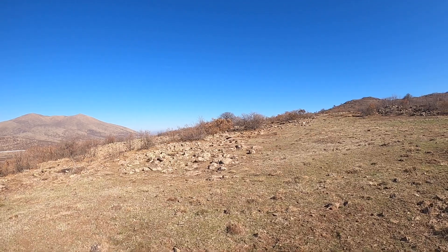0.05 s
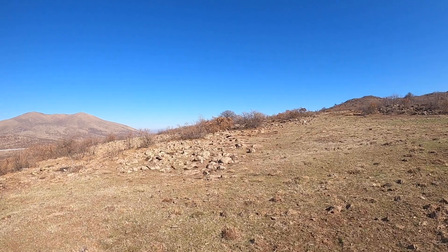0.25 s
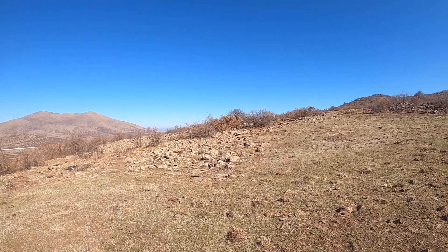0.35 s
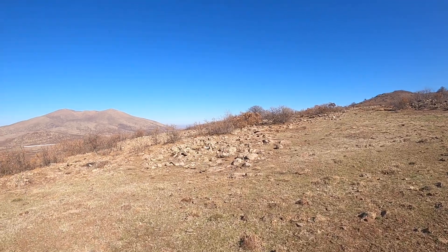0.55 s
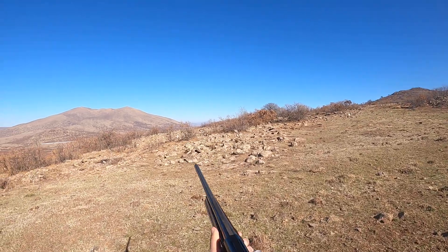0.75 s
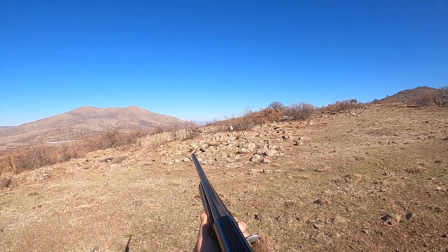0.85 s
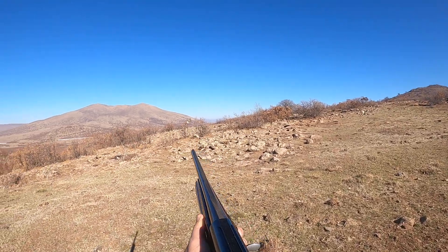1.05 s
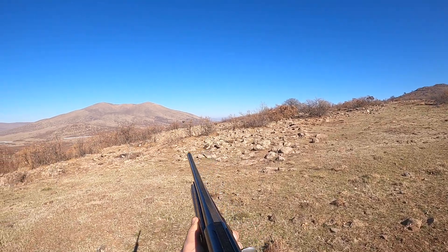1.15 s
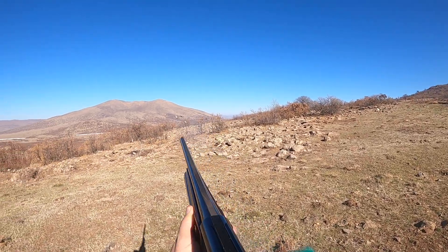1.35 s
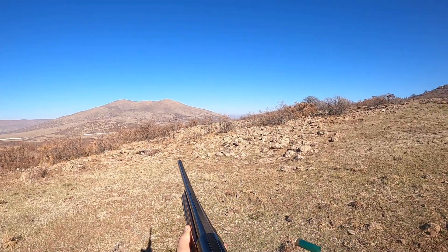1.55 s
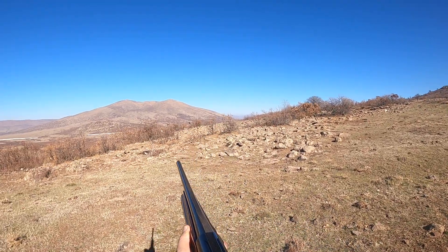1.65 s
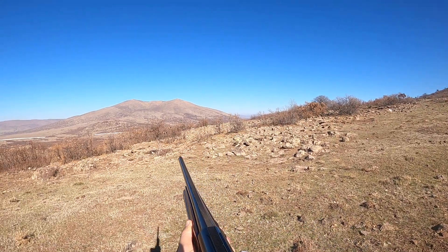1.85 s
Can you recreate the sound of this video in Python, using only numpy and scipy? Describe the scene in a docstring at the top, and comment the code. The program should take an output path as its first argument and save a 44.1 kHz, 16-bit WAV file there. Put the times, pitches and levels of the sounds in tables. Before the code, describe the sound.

One loud close shotgun shot outdoors, preceded by handling clicks and wind, followed by a short echo

```python
"""A hunter on an open hillside: wind buffets two microphone ports over the hiss of a valley, both shaped noise.
Sleeve and grass rustle as grainy noise, a partridge whirrs away in short falling whistles, and the raised gun
clicks and bumps as ringing modes and soft pulses. A soft noise and a thin high tone swell into the shot:
a cluster of dispersed pulses with the bass late, in a burst of gas hiss. The action clicks as it cycles, the
slope answers in flickering noise, and the blast overloads the recorder. Table levels are ahead of the recorder."""
import sys
import numpy as np
from scipy import signal
from scipy.fft import rfft, irfft
from scipy.io import wavfile
from scipy.ndimage import uniform_filter1d, map_coordinates

SR = 44100
rng = np.random.default_rng(int(sys.argv[2]) if len(sys.argv) > 2 else 0)


def bounce(signal):
    """Save signal as a 16-bit WAV file at the path given by the first command-line argument."""
    frames = np.transpose(np.atleast_2d(signal))
    limited = np.clip(frames, -1, 1)
    pcm = np.round(limited * 32767).astype(np.int16)
    wavfile.write(sys.argv[1], SR, pcm)


N = 83790
TIME = np.arange(N) / SR  # seconds
TRIGGER_S, GAS_S = 1.4495, 1.468  # reference moment of the shot; crest of the gas hiss
SIDE_DB = -11.5  # side (left-right difference) noise relative to the noise common to both ears

# Spectrum of the treble in rustle and echo. Each row: frequency in Hz, level per hertz in dB.
TREBLE_COLOUR = [(2060, -31), (3500, -4), (4810, -4), (6520, -7.5), (7570, -9), (12500, -24.5),
                 (15000, -35)]


def undb(db):
    """Decibels to amplitude ratio: 20 dB is a factor of ten."""
    return 10 ** (np.asarray(db, float) / 20)


def unit(x):
    """Normalise to unit root-mean-square."""
    return x / np.sqrt(np.mean(x ** 2))


def response(colour, size):
    """Gain per FFT bin, linear in dB over log frequency, falling steeply outside the given points."""
    points = np.array(colour, float)
    octave = np.log2(np.maximum(np.arange(size // 2 + 1) * SR / size, 1))
    knots = np.log2(points[:, 0])
    below = np.maximum(knots[0] - octave, 0)
    above = np.maximum(octave - knots[-1], 0)
    # 28 and 33 dB per octave
    return undb(np.interp(octave, knots, points[:, 1]) - 28 * below - 33 * above)


def noise(colour):
    """Spectral shaping: white noise filtered to a given spectrum, at unit RMS."""
    return unit(irfft(rfft(rng.standard_normal(N)) * response(colour, N), N))


def walk(rate):
    """Slow random modulation: levels held 1 / rate s, smoothed twice and scaled to unit spread."""
    hold = int(SR / rate)
    steps = np.repeat(rng.standard_normal(N // hold + 1), hold)
    smooth = uniform_filter1d(uniform_filter1d(steps, hold), hold)[:N]
    return smooth / smooth.std()


def curve(table, col):
    """Linear interpolation of one table column over time."""
    points = np.array(table, float)
    return np.interp(TIME, points[:, 0], points[:, col], left=points[0, col])


def pan(x, db):
    """Interaural level difference: left minus right in dB, shared equally between the two sides."""
    return x * undb(np.array([db, -db]).reshape(2, -1) / 2)


def wide(colour, side_db, grain_db, rate):
    """Partly correlated stereo: common and opposed noise under one random flicker of level."""
    side = undb(side_db) * noise(colour) * np.array([[1], [-1]])
    pair = noise(colour) + side
    return unit(pair * undb(grain_db * walk(rate)))


def add(out, s, x):
    """Superposition: sum a sound into the stereo mix from s seconds."""
    i = int(s * SR)
    n = min(x.shape[-1], N - i)
    out[:, i:i + n] += x[..., :n]


def ports(colour, likeness):
    """Partial coherence: turbulence at two ports shares some power, while gusts flicker separately."""
    shared = noise(colour)
    sides = []
    for _ in range(2):
        turbulence = np.sqrt(likeness) * shared + np.sqrt(1 - likeness) * noise(colour)
        sides.append(turbulence * undb(2.5 * walk(13.5)))
    pair = np.array(sides)
    return pair / np.sqrt(np.mean(pair.mean(axis=0) ** 2))


def wind():
    """Turbulent pressure at the ports: low buffeting and a faster flutter that fades after the shot."""
    # Wind on the ports. Each row: moment in seconds, level in dB, left minus right of the buffeting in dB,
    # level of the flutter relative to that level in dB.
    gusts = [(0.0, -47, 19, -2), (0.132, -37, 7, -11), (0.222, -38, 30, -8), (0.296, -40, 6.5, -13.5),
             (0.338, -27, 12.5, -16.5), (0.422, -37.5, 19, -0.5), (0.448, -27, 18, -11.5),
             (0.534, -39, 7.5, -1.5), (0.666, -37, -1, -10), (0.73, -30.5, 8.5, -5.5),
             (0.91, -31.5, 9, -14), (0.956, -31, 19, -8.5), (1.004, -40, -8, -12), (1.062, -31, 12.5, -12),
             (1.19, -29.5, 4.5, -2), (1.238, -35, 18, 4.5), (1.27, -36.5, -6, -2), (1.306, -28, 20.5, -0.5),
             (1.386, -28.5, -10, -10.5), (1.422, -32.5, 19, -7.5), (1.486, -33, 10, 15), (1.55, -49, 8, 31),
             (1.852, -38.5, 8.5, 3), (1.9, -34.5, -8, -7)]
    # Spectra of buffeting and flutter. Each row: frequency in Hz, level per hertz in dB.
    buffet_colour = [(12, -5), (20, 2), (71, -0.5), (130, -9.5), (170, -45), (290, -120)]
    flutter_colour = [(90, 0), (130, 3.5), (200, 1), (300, -10.5), (450, -24.5)]
    fade = np.clip((TRIGGER_S + 0.0531 - TIME) / 0.011, 0, 1)
    flutter = ports(flutter_colour, 0.45) * undb(curve(gusts, 3)) * fade
    buffet = pan(ports(buffet_colour, 0.26), curve(gusts, 2))
    return (buffet + flutter) * undb(curve(gusts, 1))


def valley():
    """Diffuse far sound: smooth broadband hiss whose level drifts."""
    # Distant hiss. Each row: moment in seconds, level in dB.
    hiss_level = [(0, -45.5), (.08, -49), (.14, -53), (1.4, -66), (1.5, -51), (1.9, -56.5)]
    # Spectrum of the hiss. Each row: frequency in Hz, level per hertz in dB.
    hiss_colour = [(180, -37), (300, -9), (428, -5), (453, -14), (685, -22), (1780, -8.5), (2020, -21),
                   (2200, -14.5), (2610, -17.5), (9000, -50.5), (11700, -92), (19800, -120)]
    return wide(hiss_colour, SIDE_DB, 2.2, 42.43) * undb(curve(hiss_level, 1))


def rustle():
    """Friction noise: sleeve and dry grass give grainy hiss in two bands, fading out after the shot."""
    # Rustle. Each row: moment in seconds, level of the lower band in dB, level of the treble in dB.
    rub_levels = [(0.26, -77, -81), (0.34, -52.5, -51.5), (0.382, -50.5, -56.5), (0.45, -40, -50),
                  (0.5, -45.5, -59), (0.57, -44.5, -54.5), (0.69, -41, -59), (0.984, -45, -59.5),
                  (1.178, -53, -60.5), (1.282, -53, -61), (1.378, -57.5, -64.5), (1.46, -40, -53)]
    # Spectrum of the lower band. Each row: frequency in Hz, level per hertz in dB.
    rub_colour = [(210, -32), (350, -2), (526, -4), (941, 1), (1240, -6.5), (1400, -2), (2400, -5.5),
                  (4000, -20), (5200, -24), (8800, -120)]
    grain_db = 3
    fade_out = np.clip((TRIGGER_S + 0.055 - TIME) / 0.014, 0, 1)
    fade_in = np.clip((TIME - rub_levels[0][0]) / 0.013, 0, 1) ** 2
    low = wide(rub_colour, SIDE_DB, grain_db, 90.23) * undb(curve(rub_levels, 1))
    top = wide(TREBLE_COLOUR, SIDE_DB + 8, grain_db, 120) * undb(curve(rub_levels, 2))
    return (low + top) * fade_out * fade_in


def wings():
    """Aeolian tones: each stroke is a rough falling whistle of feathers, a higher one and a puff of air."""
    # Wing strokes. Each row: start in seconds (sounded 2 ms earlier), level in dB, whistle in Hz, upper
    # whistle relative in dB, nominal length in seconds, share by which the upper pitch falls (lower: twice it).
    strokes = [(0.324, -46.5, 1050, 7, 0.0093, 0.4), (0.373, -39.5, 835, 4.5, 0.017, 0.2),
               (0.426, -32.5, 956, -8, 0.011, 0.11), (0.481, -34, 932, -7, 0.0116, 0.23),
               (0.553, -35, 830, -12, 0.0085, 0.39), (0.606, -38, 804, -28, 0.011, 0.47),
               (0.64, -27, 645, -20, 0.0085, 0.1), (0.647, -30, 1052, -23, 0.0052, 0.2),
               (0.666, -27.5, 958, 2, 0.0093, 0.17), (0.721, -34, 980, -25, 0.013, 0.39),
               (0.742, -28.5, 830, -10.5, 0.0053, 0.15), (0.773, -31, 823, -34, 0.011, 0.34),
               (0.802, -34, 757, -24, 0.023, 0.28), (0.826, -33.5, 707, -10, 0.02, 0.1),
               (0.884, -32.5, 780, -5, 0.0077, 0.16), (0.934, -35, 830, -5, 0.011, 0.21),
               (0.99, -34, 784, -3, 0.008, 0.12), (1.016, -46, 1180, -9, 0.0099, 0.49),
               (1.034, -37, 1200, -12, 0.006, 0.24), (1.045, -30.5, 956, -6, 0.011, 0.45),
               (1.074, -35.5, 980, -25, 0.006, 0.1), (1.098, -34.5, 783, -7, 0.015, 0.33),
               (1.149, -35.5, 896, -15, 0.021, 0.25), (1.207, -37.5, 846, -4, 0.015, 0.42),
               (1.26, -34.5, 810, -12.5, 0.018, 0.24), (1.318, -34.5, 760, -18, 0.014, 0.068),
               (1.36, -39.5, 980, -2.5, 0.013, 0.093), (1.375, -35.5, 764, -22, 0.0098, 0.092),
               (1.416, -39, 730, -5, 0.016, 0.049), (1.845, -34, 957, -22, 0.01, 0.44)]
    # Pitch of the upper whistle. Each row: moment in seconds, frequency in Hz.
    upper_pitch = [(.3, 2656), (.68, 2760), (.78, 2346), (1.4, 2472)]
    # Spectrum of the air puff. Each row: frequency in Hz, level per hertz in dB.
    puff_colour = [(500, -32), (900, -4.5), (2500, 5), (5000, -6), (10000, -34)]
    waver, rough, puff_db, pan_db = .15, .7, -17, -.7  # waver and rough are shares of pitch and amplitude

    def phase_per_hz(u, fall, wobble):
        return 2 * np.pi * np.cumsum(1 + fall * (.4 - u) + waver * wobble) / SR

    out = np.zeros((2, N))
    air = noise(puff_colour)
    upper_hz = curve(upper_pitch, 1)
    chance = rng.standard_normal((len(strokes), 5, 12))
    for (s, db, hz, upper_db, length, fall), draws in zip(strokes, chance):
        start = int(s * SR)
        u = np.linspace(0, 1, int(max(length, .003) * 1.105 * SR))  # progress through the stroke
        env = np.sin(np.pi * u ** 0.6) ** 2
        slow = [np.interp(u * 11, np.arange(12), d) for d in draws]
        whistle = (1 + rough * slow[0]) * np.sin(hz * phase_per_hz(u, 2 * fall, slow[1]))
        upper = np.sin(upper_hz[start] * phase_per_hz(u, fall, slow[3] / 4))
        upper = undb(upper_db) * (1 + rough / 2 * slow[2]) * upper
        puff = undb(puff_db) * air[start:][:len(u)]
        add(out, s - .002, pan(undb(db) * env * (whistle + upper + puff), pan_db))
    return out


def clicks():
    """Impulse excitation: a crack of noise also rings the resonant modes of the gun's metal."""
    # Clicks of gun and sling. Each row: start in seconds, relative level in dB, 60 dB decay of the exciting
    # noise in seconds (at least 0.004), brightness in dB per octave, rise in seconds (limited below).
    blows = [(0.334, -37.5, 0.037, 11.5, 0.0011), (0.3467, -36, 0.014, 8, 0.00057),
             (0.374, -26, 0.011, 4.5, 0.0018), (0.4011, -30, 0.034, 3.5, 0.0025),
             (0.454, -52, 0.02, 13, 0.0015), (0.471, -33.5, 0.062, 5, 0.0018),
             (0.5255, -20, 0.03, 4.5, 0.0013), (0.5292, -20.5, 0.014, -0.5, 0.00083),
             (0.5767, -13.5, 0.0078, 4.5, 0.0015), (0.5882, -23.5, 0.019, -1, 0.00085),
             (0.649, -25, 0.033, -0.5, 0.0017), (0.667, -39.5, 0.011, 12, 0.00084),
             (0.8128, -32, 0.098, 0, 0.0044), (0.8709, -34.5, 0.012, 2, 0.0025),
             (0.8838, -33, 0.014, 2, 0.0012), (0.8946, -23.5, 0.024, 3, 0.0023),
             (0.911, -36, 0.011, 3, 0.00094), (1.431, -30, 0.048, -1.5, 0.00085),
             (1.452, -22.5, 0.023, 0, 0.00081), (1.4949, -17.5, 0.028, 4.5, 0.00053),
             (1.499, -42, 0.058, 6, 0.00084), (1.5646, -28, 0.011, -4, 0.00081),
             (1.5859, -30, 0.011, 9, 0.0036), (1.5921, -17, 0.036, 4, 0.0008),
             (1.596, -52, 0.023, -8, 0.001), (1.6043, -30.5, 0.019, -26, 0.0012),
             (1.626, -33.5, 0.042, 3, 0.0015), (1.6507, -28, 0.013, 1, 0.0011)]
    # Modes of the gun. Each row: frequency in Hz, width in Hz, level in dB.
    gun_modes = [(1190, 550, 15), (1690, 410, 9), (2780, 480, -1.5), (3890, 700, -11), (4730, 520, -6.5),
                 (6350, 290, -22.5), (8280, 520, -12.5)]
    # Spectrum of the crack. Each row: frequency in Hz, level per hertz in dB.
    crack_colour = [(290, 0), (500, 8), (745, 3), (2880, 11), (3720, 2.5), (8490, -10), (12300, -24),
                    (15000, -55)]
    modes_db, scatter_db = -2, 3  # ring relative to crack; unevenness of the modes from blow to blow
    out, size = np.zeros((2, N)), 4096
    t = np.arange(size) / SR - .02
    f = np.arange(size // 2 + 1) * SR / size
    modes = np.array([undb(db) / (1 + 2j * (f - hz) / width) ** 2 for hz, width, db in gun_modes])
    crack = unit(response(crack_colour, size))
    chance = rng.standard_normal((len(blows), 2, size))
    for (s, db, t60, tilt_db, rise), draws in zip(blows, chance):
        rise = np.clip(rise, .0003, .008)
        attack = np.exp(-2 * ((t - rise) / rise) ** 2)
        decay = undb(-60 * (t - rise) / max(t60, .004))
        env = np.where(t < rise, attack, decay)
        ring = undb(scatter_db * draws[0, :len(modes)]) @ modes
        body = crack + undb(modes_db) * ring / np.sqrt(np.mean(abs(ring) ** 2))
        hit = (draws[0] + undb(SIDE_DB) * draws[1] * np.array([[1], [-1]])) * env
        tilt = undb(tilt_db * np.log2(np.maximum(f, 500) / 4000))
        x = irfft(rfft(hit) * body * tilt, size)
        level = undb(db) * np.sqrt(np.sum(env ** 2) / np.sum(x[0] ** 2)) / 2  # equal energy for equal envelopes
        add(out, s - .02, x * level)
    return out


def bumps():
    """Momentum transfer: each bump is one soft pressure push with a broader rebound."""
    # Bumps of the stock on the body, and the recoil. Each row: centre in seconds, level in dB,
    # time scale in seconds, left minus right in dB.
    pushes = [(0.406, -18, 0.0022, 0), (0.7477, -10.5, 0.0042, 10), (0.801, -19.5, 0.0022, 1),
              (1.4723, -21, 0.0054, -26), (1.478, -16, 0.0019, -1), (1.8745, -32, 0.0029, -25)]
    out = np.zeros((2, N))
    for s, db, length, pan_db in pushes:
        u = np.arange(-3 * length, 5 * length, 1 / SR) / length
        push = -np.exp(-(u / 0.31) ** 2)
        rebound = 0.068 * np.exp(-((u - .55) / 1.4) ** 2) + 0.2 * np.exp(-((u + 0.1) / 1.1) ** 2)
        add(out, s - 3 * length, pan(undb(db) * (push + rebound), pan_db))
    return out


def lead_in():
    """Exponential growth: a soft noise and a thin high tone swell into the shot, then stop quickly."""
    # Spectrum of the soft noise. Each row: frequency in Hz, level per hertz in dB.
    swell_colour = [(300, -3), (800, 0), (1800, -8), (3500, -17), (7000, -27), (12000, -48)]
    end_s, tone_start_s, tone_hz = 1.465, 1.436, 7920
    t = TIME - end_s

    def swell(rise_s):
        return np.exp(np.minimum(t, 0) / rise_s - np.maximum(t, 0) / .002)

    swell_noise = wide(swell_colour, SIDE_DB, 3.9, 300) * undb(-17)
    gate = np.clip((TIME - tone_start_s) / .004, 0, 1)
    tone = np.sin(2 * np.pi * tone_hz * t) * undb(-33 + 2 * walk(300)) * gate
    return swell_noise * swell(.006) + tone * swell(.013)


def blast():
    """Dispersion: each arrival is a pulse with late bass, scattered off arms and body, amid gas hiss."""
    # Arrivals from muzzle, action, ground and rocks. Each row: start in seconds, peak in dB before panning,
    # left minus right in dB, tilt in dB per octave, share of the smear.
    arrivals = [(1.4656, -2, -1, -1.5, 1), (1.4682, -5, -1, 5, .1), (1.4716, -2, 0, 4.5, .12),
                (1.4738, -6, 0, -1, .25), (1.4785, -8, 0, -6, .3), (1.4933, -11, .5, 3.5, .2)]
    # Spectra of pulse and gas. Each row: frequency in Hz, level in dB (per hertz for the gas).
    pulse_colour = [(60, -20), (250, -8), (550, -14), (1100, -3), (1700, -3), (3500, -11), (8000, -22),
                    (12300, -39), (15000, -70)]
    gas_colour = [(290, -29), (500, -35), (1150, -34), (1510, -13), (2160, -1), (8240, -5), (14500, -33)]
    smear_s, smear_law = .006, .9  # full-share delay at 1 kHz; its growth toward the bass
    scatter_db, scatter_t60_s = -3, .012
    gas_attack_s, gas_t60_s, gas_db = .0015, .06, -15
    out, size = np.zeros((2, N)), 8192
    f = np.maximum(np.arange(size // 2 + 1) * SR / size, 60)
    delay = smear_s * (np.clip(f, 500, 5000) / 1000) ** -smear_law
    phase = 2 * np.pi * np.cumsum(delay) * SR / size  # phase is the integral of group delay
    decay = undb(-60 * np.arange(size) / SR / scatter_t60_s)
    for s, db, pan_db, tilt_db, share in arrivals:
        smear = response(pulse_colour, size) * np.exp(-1j * share * phase)
        tail = np.array([[1, 0.47], [1, -0.63]]) @ rng.standard_normal((2, size)) * decay
        paths = 1 + undb(scatter_db) * rfft(tail) / np.sqrt(np.sum(tail ** 2) / 2)
        tilt = undb(tilt_db * np.log2(np.maximum(f, 500) / 2000))
        pulse = irfft(smear * paths * tilt, size)[:, :size // 2]
        add(out, s, pan(undb(db) * pulse / abs(pulse).max(), pan_db))
    t = TIME - GAS_S
    env = np.where(t < 0, np.exp(t / gas_attack_s), undb(-60 * np.maximum(t, 0) / gas_t60_s))
    return out + wide(gas_colour, 0.0, 2.2, 130) * env * undb(gas_db)


def echo():
    """Diffuse reflection: slope, rocks and scrub return flickering noise in bands over a decaying body."""
    # Echo. Each row: moment in seconds, level of the middle band in dB, of the rumble in dB, of the treble in dB.
    returns = [(1.49, -34, -26, -39.5), (1.51, -46, -48, -51.5), (1.55, -43.5, -27.5, -52.5),
               (1.6, -42, -31.5, -51), (1.62, -43, -44, -54), (1.65, -43.5, -34.5, -57.5),
               (1.69, -41.5, -38.5, -65), (1.73, -38.5, -38.5, -60), (1.755, -45.5, -39.5, -62.5),
               (1.78, -42, -46, -64), (1.8, -45.5, -48, -71), (1.825, -57, -42.5, -74),
               (1.86, -51.5, -53, -78), (1.9, -60.5, -43, -93)]
    # Spectra of middle band, rumble and low-mid tail. Each row: frequency in Hz, level per hertz in dB.
    mid_colour = [(260, -35), (450, -35), (579, -41), (636, -12.5), (2670, -8), (3400, -18.5),
                  (3890, -16.5), (5500, -26.5), (7150, -31.5), (12100, -120)]
    rumble_colour = [(41, -74), (70, -20), (86, -10), (135, 6), (274, -0.5), (434, -14), (600, -19),
                     (780, -37), (1320, -120)]
    body_colour = [(200, -6), (330, -1.5), (600, -10), (950, -2.5), (1400, -13)]
    grain_db, side_db = 2.6, -13.
    body_db, body_t60_s = -30, 0.4
    onset = np.clip((TIME - TRIGGER_S) / 0.017, 0, 1)
    mid = wide(mid_colour, side_db, grain_db, 150) * undb(curve(returns, 1))
    rumble = wide(rumble_colour, side_db - 7, grain_db, 29.8) * undb(curve(returns, 2))
    top = wide(TREBLE_COLOUR[2:], side_db + 11.5, grain_db, 77.6) * undb(curve(returns, 3))
    since = TIME - GAS_S
    decay = undb(body_db - 60 * np.maximum(since, 0) / body_t60_s) * (since > 0)
    body = wide(body_colour, side_db - 3, grain_db, 58.2) * decay
    return (mid + rumble + top) * onset + body


def scene():
    """Interaural time difference: all but the wind reaches the left port slightly later."""
    heard = valley() + rustle() + wings() + clicks() + bumps() + lead_in() + blast() + echo()
    lag_s = .000034
    left = map_coordinates(heard[0], [np.arange(N) - lag_s * SR], mode="nearest")
    return wind() + np.array([left, heard[1]])


def record(dry):
    """Saturation and band limiting: a tanh curve rounds the peaks, a steep low-pass cuts the top."""
    rounded = np.tanh(1.5 * dry) * .98
    top_hz = 15600
    lowpass = signal.ellip(10, .2, 80, top_hz, fs=SR, output="sos")
    return signal.sosfilt(lowpass, rounded)


dry = scene()
out = record(dry)
bounce(out)
```